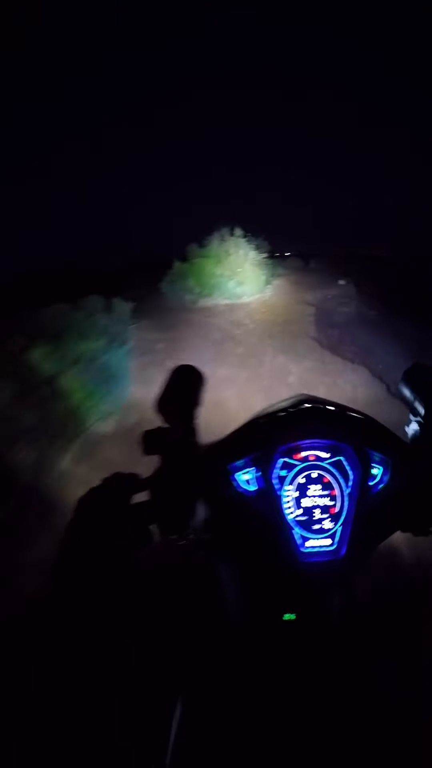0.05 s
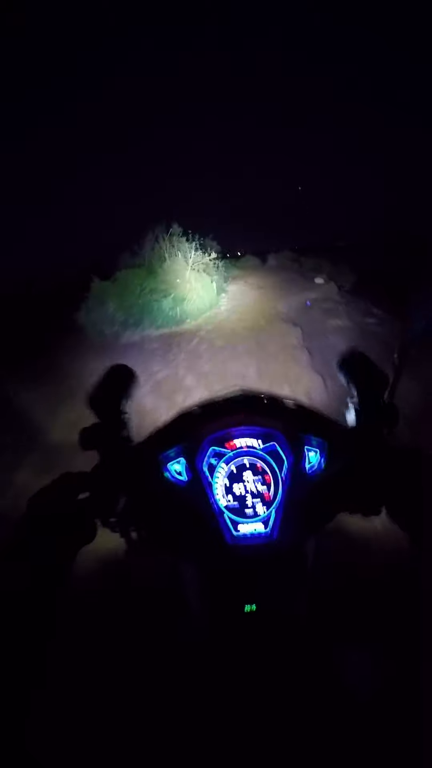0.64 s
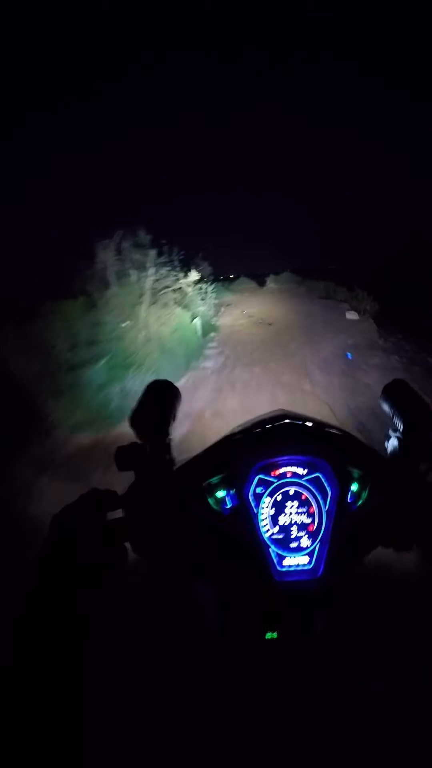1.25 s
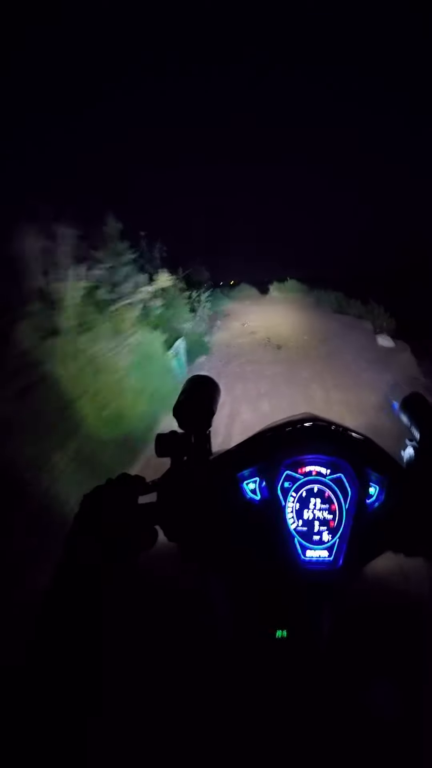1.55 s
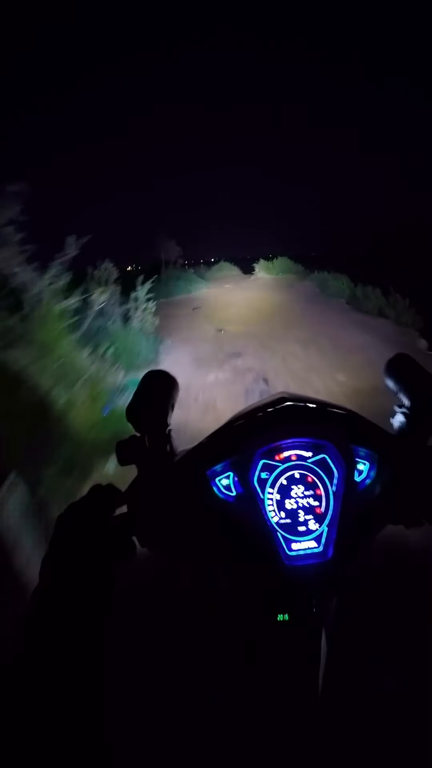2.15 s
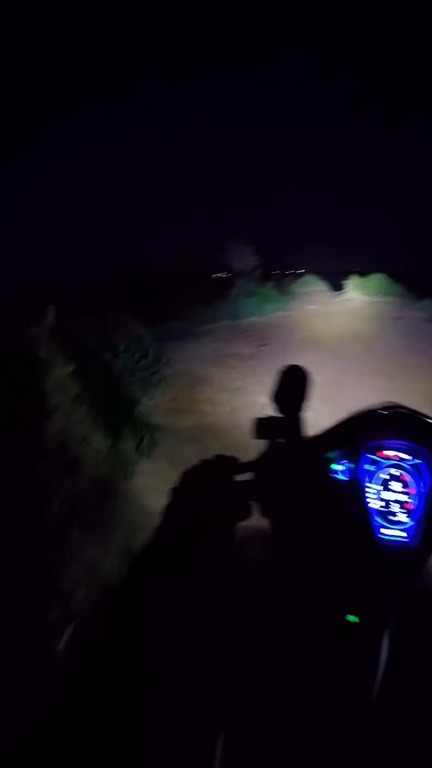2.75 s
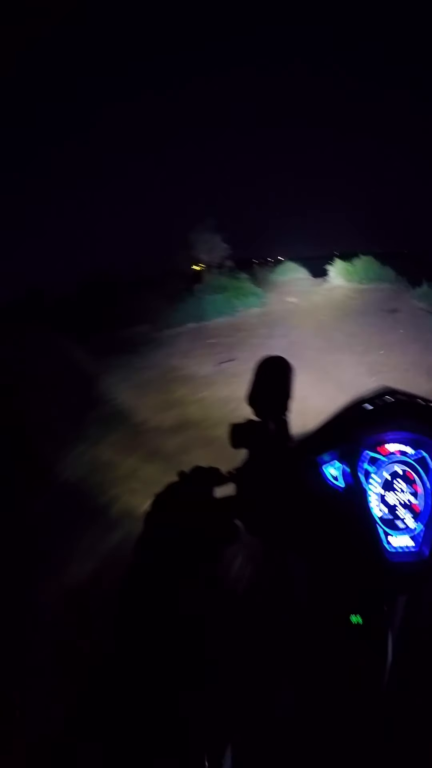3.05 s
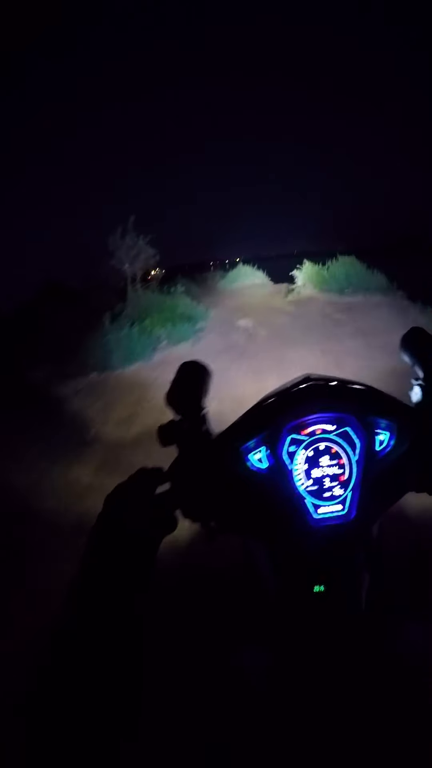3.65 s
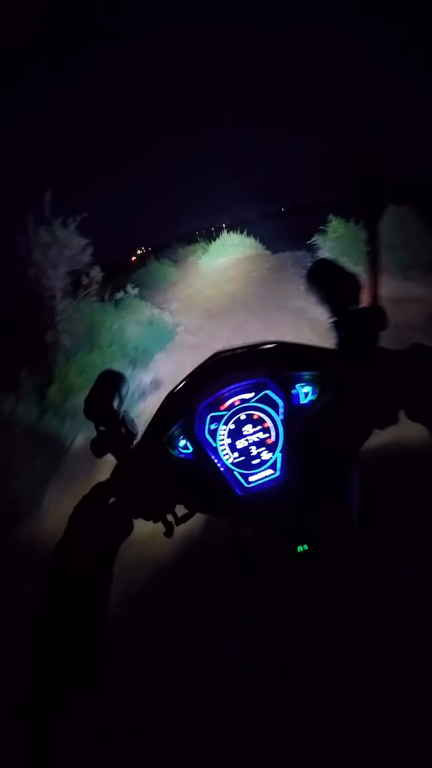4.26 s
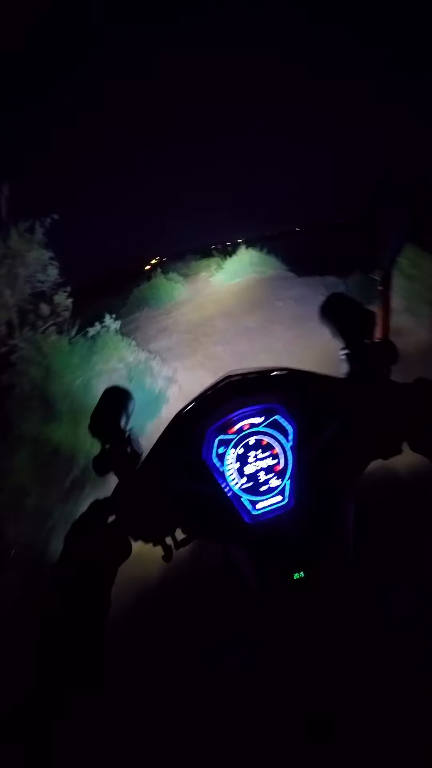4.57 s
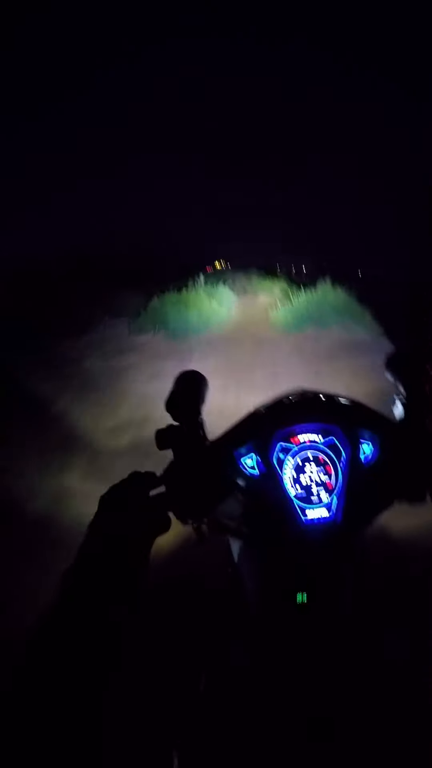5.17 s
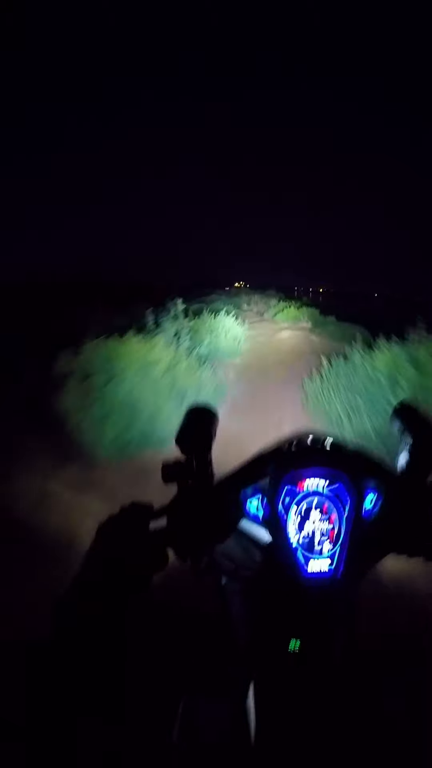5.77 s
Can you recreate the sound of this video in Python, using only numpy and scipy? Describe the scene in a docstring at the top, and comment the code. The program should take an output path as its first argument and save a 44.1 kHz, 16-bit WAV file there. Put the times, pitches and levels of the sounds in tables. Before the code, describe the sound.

A small four-stroke moped putters over a rough dirt track, heard close from the rider's seat on the left channel only. Its pitch stays fairly even while loudness and tone follow the throttle. From about 0.3 to 1 second, several short pushes bring a hollow intake growl and metallic knocking. The engine then eases and coasts quietly until about 3 seconds. Ruts make the plastic panels slap and clatter, most busily from 0.7 to 2.3 seconds, and keys jingle brightly at the ignition, strongest around 1.3 seconds. A faint hiss of sand hits the mudguard between 2 and 3 seconds. The throttle opens again in bursts from 3 to 3.7 seconds, then more strongly from 4 to 4.9. The engine settles to a lighter putter, with a few more panel knocks near 5.6 seconds, and drops off at 5.8. Tyres and air rumble softly throughout.

```python
"""A four-stroke moped putters over a rough dirt track, heard from the rider's seat on the left channel.
Each engine cycle gives a knock with an exhaust puff, then an airbox gulp that swells as the throttle opens.
Ruts make the plastic fairing clatter and keys jingle at the ignition.
Sand sprays against the mudguard; tyres and air rumble underneath."""
import sys
import numpy as np
from scipy import signal
from scipy.fft import rfft, irfft
from scipy.io import wavfile

SR = 44100
rng = np.random.default_rng(int(sys.argv[2]) if len(sys.argv) > 2 else 0)


def log_audio(samples):
    """Write samples as a 16-bit WAV file to the path given in sys.argv[1]."""
    # one column per channel
    frames = np.atleast_2d(samples).T
    # limit to full scale, then quantise
    limited = np.clip(frames, -1, 1)
    pcm = np.round(limited * 32767).astype(np.int16)
    wavfile.write(sys.argv[1], SR, pcm)


N = 256220
TIME = np.arange(N) / SR

# modes of each key: f/Hz, level/dB
KEY_MODES = {"tiny": [(14950, 0), (14610, -18)], "long": [(11962, 0), (9070, -12), (12757, -15)],
             "slim": [(12757, 0)], "flat": [(9070, 0)], "broad": [(9803, 0)], "short": [(10596, 0),
             (11151, -7)]}
# fairing's response to a jolt: f/Hz, density/dB
SLAP_SPECTRUM = [(100, -5), (300, -16), (480, 3), (650, -2), (820, -11), (1040, -6.5), (1250, -8.5),
                 (1900, -22), (2700, -17), (3700, -22.5), (4400, -37.5), (7000, -33), (15000, -33)]


def engine():
    """Single cylinder: its sounds are tied to the four-stroke cycle and follow the load."""
    # engine speed: t/s, firing rate/Hz
    firing = [(0.0, 28.55), (0.33, 25.79), (0.5, 27.92), (0.7, 27.94), (0.87, 26.71), (1.17, 26.57),
              (1.6, 33.05), (2.05, 26.98), (2.9, 29.09), (3.1, 26.99), (3.33, 28.08), (3.56, 27.6),
              (3.9, 25.14), (4.12, 28.15), (4.45, 28.34), (4.92, 27.77), (5.25, 26.33), (5.81, 27.58)]
    # throttle opens, coasts over the ruts, then pushes in bursts: t/s, load/dB (0 = wide open)
    throttle = [(0, -35), (.2, -26), (.28, -5.5), (.36, -12), (.43, -0.5), (.51, -5.5), (.75, -2.5),
                (.85, -17), (.92, -2.5), (1.1, -12), (1.27, -18), (2.0, -32), (2.6, -35.5), (2.92, -26),
                (3.02, -6), (3.1, -10), (3.18, -1.5), (3.32, -11.5), (3.43, -2), (3.52, -7), (3.6, -4.5),
                (3.7, -15), (3.89, -19), (3.98, -2.5), (4.03, 1), (4.11, -13), (4.19, 0.5), (4.26, 2),
                (4.32, -4), (4.41, -8), (4.48, 0.5), (4.56, 1.5), (4.67, -7.5), (4.76, -4.5), (4.81, 0.5),
                (4.87, 1.5), (4.93, -6.5), (5.3, -11.5), (5.67, -12), (5.81, -50)]
    cycles = .255 + np.cumsum(curves(firing)[0]) / SR
    load_db = curves(throttle)[0]
    return gas(cycles, load_db) + metal(cycles, load_db)


def gas(cycles, load_db):
    """The airbox gulps, higher under load; exhaust rings pipe and silencer; the piston expels the rest."""
    # intake air: f/Hz, density/dB
    churn = [(60, -18), (160, -28), (220, 9.5), (320, 9.5), (380, 6.5), (480, 10), (600, -33), (1000, -14),
             (2000, -28.5)]
    gulp = puffs(cycles, at=.535, hz=287 + 1.3 * load_db, swell_s=.006, uneven_db=.8, jitter_s=5e-5, order=3)
    airbox = -puffs(cycles, at=.615, hz=222, swell_s=.011, uneven_db=.8, jitter_s=1e-4)
    exhaust = puffs(cycles, at=.91, hz=112, swell_s=.0033, uneven_db=1, jitter_s=1e-4)
    pipe = puffs(cycles, at=.91, hz=500, swell_s=.008, uneven_db=1.5, jitter_s=1.5e-4)
    silencer = puffs(cycles, at=.09, hz=254, swell_s=.0042, uneven_db=1, jitter_s=1e-4, order=2)
    piston = puffs(cycles, at=.28, hz=41, swell_s=.0033, uneven_db=1, jitter_s=2e-4)
    intake = amp(-29.5 + load_db) * (gulp + .25 * colour(noise(), churn))
    flow = amp(.81 * np.minimum(load_db + 11, 0))  # steady above a light load
    drone = amp(-41.5) * airbox + amp(-40.5) * exhaust + amp(-43.5) * piston + amp(-45) * pipe
    return intake + flow * drone + amp(-38.5 + .72 * load_db) * silencer


def metal(cycles, load_db, burn_lag_s=.013):
    """Combustion knocks on the casing and rings the fins; the valve gear ticks and hisses."""
    # combustion knock: f/Hz, density/dB
    knock_spectrum = [(300, -3), (500, -9), (800, 4.5), (1050, 3.5), (1240, 12.5), (1450, -8.5), (2000, -6),
                      (2500, -69), (3100, -1.5), (3750, -14.5), (4300, -43), (8500, -13), (15000, -26)]
    # bright crack opening each firing: f/Hz, density/dB
    crack_spectrum = [(1000, -20), (3000, -19), (3750, 22), (4400, -22), (5500, 3), (8500, 3), (11000, 2),
                      (15000, -34)]
    # valve hiss: f/Hz, density/dB
    hiss_spectrum = [(1200, 2), (2000, -12), (2250, -1), (2450, 6), (2850, -2), (3600, -11), (4300, -22),
                     (7000, -17.5), (14500, -15.5)]
    # slow drift of the metallic noises: t/s, tick gain/dB, knock gain/dB
    drift = [(0, -4, -10), (.33, -9, -3.5), (.7, -14.5, 0), (.97, -3, -3), (2.5, 1, -0.5),
             (3.05, -3.5, -3.5), (3.6, -4, -4.5), (4.0, -8, -3.5), (4.28, -12, 0.5), (4.55, -9.5, -1),
             (4.88, -9, -1), (5.2, -10.5, -6), (5.81, -11, -7)]
    tick_drift_db, knock_drift_db = curves(drift)
    # the charge burns after its gulp, so the knock trails the load
    knock_db = -45 + .48 * np.interp(TIME - burn_lag_s, TIME, load_db) + knock_drift_db
    coast_db = .5 * np.minimum(load_db + 7, 0)  # valve gear fades below a light load
    valve_db = -45 + coast_db
    knock = amp(knock_db + 1.5) * colour(unit(burst(cycles, at=.915, decay=.1)) * noise(), knock_spectrum)
    snap = unit(burst(cycles, at=.915, decay=.08))
    crack = amp(knock_db - 11.5) * colour(snap * noise(), crack_spectrum)
    high_mode = puffs(cycles, at=.975, hz=1240, swell_s=.002, uneven_db=2, jitter_s=3e-4, spread=.03)
    low_mode = puffs(cycles, at=.965, hz=1040, swell_s=.002, uneven_db=3, jitter_s=3e-4, spread=.04)
    casing = amp(knock_db - 3) * high_mode + amp(knock_db - 5) * low_mode
    fins = puffs(cycles, at=.95, hz=3680, swell_s=.0016, uneven_db=4, jitter_s=4e-4, order=2, spread=.02)
    fins *= amp((knock_db + valve_db) / 2 - 13 + .35 * coast_db)
    tick = puffs(cycles, at=.02, hz=2420, swell_s=.0023, uneven_db=4, jitter_s=5e-4, spread=.025)
    tock = puffs(cycles, at=.4, hz=2440, swell_s=.003, uneven_db=3, jitter_s=.004, order=2, spread=.025)
    # throttle shut: ticks sink into the hiss
    ticks = amp(valve_db + coast_db + tick_drift_db) * (tick + .6 * tock)
    valves = .7 + .65 * burst(cycles, at=.22, decay=.25) + .2 * stroke(cycles, at=.02, width=.07)
    hiss = amp(valve_db + .5) * colour(unit(valves) * noise(), hiss_spectrum)
    return knock + crack + casing + fins + ticks + hiss


def fairing(taps_per_s=600, tap_s=.0022, attack_s=.00054, rattle_s=.019):
    """Loose panels chatter throughout; at each jolt they slap, thud and rattle on."""
    # track roughness: t/s, relative chatter level/dB
    roughness = [(0, -51), (.22, -50.5), (.32, -44), (1.15, -40.5), (1.8, -43), (2.2, -47.5), (2.85, -48.5),
                 (3.22, -40.5), (3.85, -46), (4.1, -41), (5.6, -41), (5.81, -42)]
    # jolts: t/s, relative level/dB, slap decay/s
    ruts = [(0.277, -20.5, 0.019), (.305, -36, 0.012), (0.74, -16, 0.0085), (0.779, -22, 0.045),
            (.805, -32, 0.016), (1.037, -19.5, 0.011), (1.058, -22.5, 0.035), (1.109, -22, 0.022),
            (1.143, -15, 0.01), (1.173, -16, 0.023), (1.2, -26, 0.017), (1.387, -15, 0.012),
            (1.412, -15, 0.012), (1.447, -23, .006), (1.464, -21.5, 0.0037), (1.486, -20, 0.014),
            (1.572, -22, 0.0094), (1.607, -16.5, 0.027), (1.634, -17.5, 0.0047), (1.73, -17.5, 0.018),
            (1.756, -20.5, 0.016), (1.778, -24, 0.026), (1.798, -18, 0.011), (1.93, -25.5, 0.013),
            (2.036, -28, 0.05), (2.071, -17, 0.013), (2.097, -18, 0.0079), (2.13, -35, 0.0084),
            (2.277, -23, 0.015), (2.289, -32, 0.0069), (2.77, -16, 0.0094), (2.788, -21.5, 0.0071),
            (2.928, -26, 0.017), (3.219, -20, 0.017), (4.872, -33, .012), (5.588, -18, 0.0087),
            (5.61, -17, 0.01), (5.648, -25, 0.021)]
    # loose panels: f/Hz, density/dB
    panel_spectrum = [(80, -10), (190, -2.5), (330, 0.5), (480, 6.5), (620, 0), (800, -4.5), (1080, -13.5),
                      (1300, -14.5), (1600, -14), (2000, -19.5), (2600, -18), (3600, -20.5), (4400, -35.5),
                      (7000, -32), (15000, -36)]
    # hollow body under the fairing: f/Hz, density/dB
    thud_spectrum = [(200, -21), (420, -11), (490, 20), (570, -5), (660, -11), (1000, -29), (3000, -60)]
    t = np.arange(SR // 4) / SR
    taps = (rng.random(N) < taps_per_s / SR) * 1.
    chatter = unit(signal.oaconvolve(taps, np.exp(-t / tap_s))[:N] * noise())
    shake, slaps = amp(curves(roughness)[0] + 3.5), np.zeros(N)
    for s, db, decay_s in ruts:
        add(shake, s, amp(db - 19.5) * np.exp(-t / rattle_s))
        add(slaps, s, amp(db - 15) * (1 - np.exp(-t / attack_s)) * np.exp(-(t / decay_s) ** 2 / 2))
    thud = amp(-7) * colour(slaps * noise(), thud_spectrum)
    panels = colour(shake * unit(chatter + .81 * noise()), panel_spectrum)
    return panels + colour(slaps * noise(), SLAP_SPECTRUM) + thud


def fittings(clicks_per_s=22, decay_s=.0027):
    """Small loose fittings click softly at random."""
    clicks = (rng.random(N) < clicks_per_s / SR) * rng.uniform(.16, 1, N)
    envelope = signal.oaconvolve(clicks, np.exp(-np.arange(SR // 20) / SR / decay_s))[:N]
    return amp(-43) * colour(envelope * noise(), SLAP_SPECTRUM)


def key_clinks(free_t60_s=.15, touch_t60_s=.043, contact_s=.00048, tick_s=.013):
    """A struck key ticks and rings until it lands on a neighbour, which adds damping."""
    # clinks of each key: t/s, level/dB, free ringing/s
    clinks = { "tiny": [(.776, -38, .004), (.792, -43, .02), (.825, -38, .008), (.883, -42, .004),
              (1.088, -39, .016), (1.175, -45, .015), (1.216, -39, .04), (1.268, -40, .005),
              (1.324, -32, .022), (1.379, -33, 0.026), (1.525, -33, .008), (1.891, -42, .004),
              (2.002, -43, .008), (2.191, -48, .006), (3.294, -48, .004)], "long": [(.772, -51, .004),
              (.789, -51, .006), (.882, -49, .004), (1.085, -46, .015), (1.124, -45, .035),
              (1.214, -44, .02), (1.267, -41, 0.0072), (1.324, -31, 0.021), (1.381, -39, 0.062),
              (1.525, -35, .004), (2.056, -42, .004), (5.189, -44, .004)], "slim": [(1.166, -47, .06),
              (1.257, -50, .05), (1.374, -43, .06), (1.44, -52, .08), (1.99, -55, .08), (2.275, -51, .03),
              (2.777, -48, .008)], "flat": [(.61, -47, 0.0036), (.775, -50, .004), (1.071, -43, .004),
              (1.085, -38.5, 0.021), (1.3, -46, .004), (1.43, -49, .005)], "broad": [(.304, -48, .004),
              (.459, -42.5, .004), (.655, -46, .004), (.745, -44, 0.0051), (.776, -33, 0.0022),
              (.798, -42, .004), (.831, -44, 0.0045), (1.165, -41, .004), (1.342, -39, 0.018),
              (1.375, -37, .008), (1.784, -41.5, .005), (1.95, -43.5, .008), (2.065, -42, .005),
              (2.079, -37, .008), (2.117, -41.5, 0.0041), (2.27, -42.5, .008), (2.453, -44.5, 0.0057),
              (2.954, -43, 0.0046), (3.189, -37.5, 0.0037), (5.314, -44.5, 0.0074)],
              "short": [(.776, -46, .004), (1.205, -48, .005), (1.472, -50, .008), (1.966, -45, .004),
              (1.98, -38.5, 0.0057), (2.079, -42, .005), (2.191, -45, 0.01), (2.33, -50, .004),
              (2.771, -45.5, 0.0074), (3.358, -46, .005), (5.247, -47.5, .005), (5.756, -42.5, 0.0046)]}
    t, out = np.arange(SR // 7) / SR, np.zeros(N)
    for key, strikes in clinks.items():
        for s, level_db, free_s in strikes:
            fade_db = 60 * (t / free_t60_s + np.maximum(t - free_s, 0) / touch_t60_s)
            envelope = amp(level_db - fade_db) * (1 - np.exp(-t / contact_s))
            for hz, db in KEY_MODES[key]:
                # the contact point favours some modes and loads the key slightly
                favour, detune, phase = rng.standard_normal(3)
                ring = np.sin(2 * np.pi * (hz * (1 + .0015 * detune) * t + phase))
                add(out, s, amp(db + .99 * favour) * envelope * ring)
            tick = np.diff(rng.standard_normal(len(t) + 2), 2) * np.exp(-t / tick_s)
            add(out, s, amp(level_db - 17) * tick)
    return out


def key_jingle(touches_per_s=90, attack_s=.00032, ring_s=.0047):
    """The swinging keys brush and scrape each other lightly."""
    # briskness of the swing: t/s, relative level/dB
    swing = [(0, -22), (.65, -24), (.8, 16.5), (.95, -12), (1.38, 10), (1.62, -13), (2.05, 0), (2.4, -14),
             (5.81, -14)]
    strength = amp(curves(swing)[0])
    t, out = np.arange(SR // 20) / SR, np.zeros(N)
    envelope = np.exp(-t / ring_s) * (1 - np.exp(-t / attack_s))
    for modes in KEY_MODES.values():
        touches = rng.random(N) < touches_per_s / len(KEY_MODES) / SR
        tone = sum(amp(db) * np.sin(2 * np.pi * hz * t) for hz, db in modes)
        scrape = amp(-9) * np.diff(rng.standard_normal(len(t) + 2), 2)
        out += signal.oaconvolve(touches * strength, envelope * (tone + scrape))[:N]
    return amp(-50) * out


def sand():
    """The tyres throw short sprays of sand at the mudguard."""
    # sprays: t/s, level/dB, length/s
    sprays = [(0.11, -56, 0.0092), (1.959, -48, 0.0079), (2.393, -55, 0.053), (2.524, -51, 0.0041),
              (2.572, -60.5, 0.45), (2.93, -53, .008), (5.028, -48, 0.0077)]
    # sand on the mudguard: f/Hz, density/dB
    spray_spectrum = [(3500, -12), (5200, -4), (6600, 6.5), (8500, -2), (10500, 3), (15000, -2)]
    out = np.zeros(N)
    for s, db, length_s in sprays:
        window = signal.windows.tukey(int(length_s * SR), .5)
        add(out, s, amp(db) * window * noise()[:len(window)])
    return colour(out, spray_spectrum)


def rumble(lumps_db=1.0, lumps_hz=8.1):
    """Tyres and passing air rumble in lumps."""
    # tyres and air: t/s, relative level/dB
    road = [(0, -29.5), (.2, -34), (1.25, -33.5), (1.8, -30), (2.2, -36), (3.2, -35.5), (4.6, -34),
            (4.86, -26.5), (5.15, -35), (5.81, -32.5)]
    # road rumble: f/Hz, density/dB
    road_spectrum = [(10, -27), (28, 2.5), (60, 0), (90, 0), (150, -4.5), (250, -7.5), (500, -22),
                     (1500, -52)]
    return amp(curves(road)[0] - 5 + lumps_db * wander(lumps_hz)) * colour(noise(), road_spectrum)


def puffs(cycles, at, hz, swell_s, uneven_db, jitter_s, order=1, spread=0):
    """A cavity or metal part rings once a cycle at phase `at`; spread is relative pitch scatter; rms 1."""
    times = TIME[1:][np.diff(np.floor(cycles - at)) > 0]
    t = np.arange(-swell_s, 6 * swell_s, 1 / SR)
    age = np.maximum(1 + t / swell_s, 0)
    swell = (age * np.exp(1 - age)) ** order
    out = np.zeros(N)
    for s, (size, late, sharp) in zip(times, rng.standard_normal((len(times), 3))):
        ring_hz = np.broadcast_to(hz, N)[round(s * SR)] * (1 + spread * sharp)
        ring = swell * np.cos(2 * np.pi * ring_hz * t)
        add(out, s - swell_s + jitter_s * late, amp(uneven_db * np.clip(size, -2, 2)) * ring)
    return unit(out)


def burst(cycles, at, decay):
    """Window that snaps open once a cycle and dies away; at, decay in cycles."""
    return np.exp(-((cycles - at) % 1) / decay)


def stroke(cycles, at, width):
    """Gaussian window once a cycle; at, width in cycles."""
    return np.exp(-.5 * (((cycles - at + .5) % 1 - .5) / width) ** 2)


def colour(x, spectrum, size=4096):
    """Minimum-phase filter of unit energy with the given spectral shape."""
    hz, db = np.transpose(spectrum)
    bin_hz = abs(np.fft.fftfreq(size, 1 / SR))
    log_gain = np.log(amp(np.interp(np.log(bin_hz + 1), np.log(hz), db)))
    impulse = np.fft.ifft(np.exp(np.conj(signal.hilbert(log_gain)))).real[:size // 2]
    return signal.oaconvolve(x, impulse / np.linalg.norm(impulse))[:N]


def noise():
    """White noise."""
    return rng.standard_normal(N)


def wander(hz):
    """Random drift up to about hz; rms 1."""
    lowpass = np.exp(-(np.fft.rfftfreq(N, 1 / SR) / hz) ** 2)
    return unit(irfft(rfft(noise()) * lowpass, N))


def amp(db):
    """dB to gain."""
    return 10 ** (np.asarray(db) / 20)


def unit(x):
    """Scale to rms 1."""
    return x / np.sqrt(np.mean(x ** 2) + 1e-20)


def curves(table):
    """Value columns of a timed table, per sample."""
    s, *columns = np.transpose(table)
    return [np.interp(TIME, s, column) for column in columns]


def add(mix, s, sound):
    """Mix a sound in at time s."""
    part = mix[max(round(s * SR), 0):][:len(sound)]
    part += sound[:len(part)]


def scene():
    """The ride on the left; only a faint trace and noise on the right."""
    ride = engine() + fairing() + fittings() + key_clinks() + key_jingle() + sand() + rumble()
    floor_spectrum = [(20, 4.5), (200, -7.0), (1000, -13.5), (15000, -20.5)]  # f/Hz, density/dB
    floor = amp(-66) * colour(noise(), floor_spectrum)
    return np.array([amp(7) * ride, amp(-68) * ride + floor])


def record(dry):
    """Low cut at 8 Hz, band limit at 15350 Hz."""
    low_cut = signal.lfilter(*signal.butter(1, 8, "high", fs=SR), dry)
    band_limit = signal.firwin(401, 15350, window=("kaiser", 8), fs=SR)
    return signal.oaconvolve(low_cut, band_limit[None], "same")


dry = scene()
out = record(dry)
log_audio(out)
```